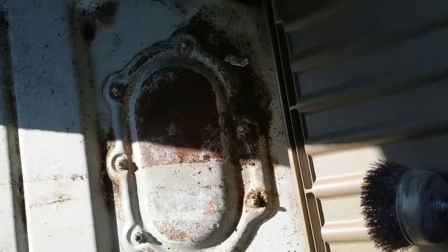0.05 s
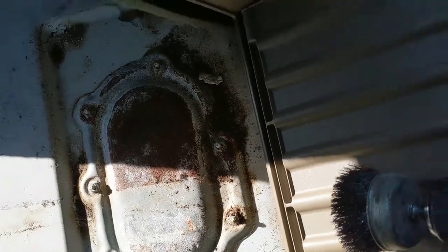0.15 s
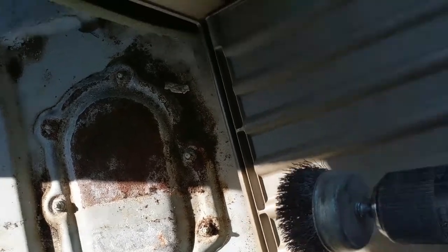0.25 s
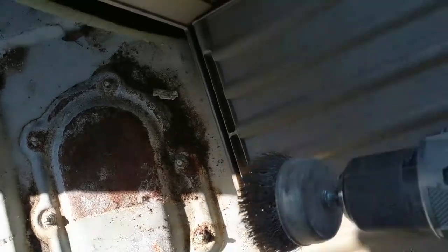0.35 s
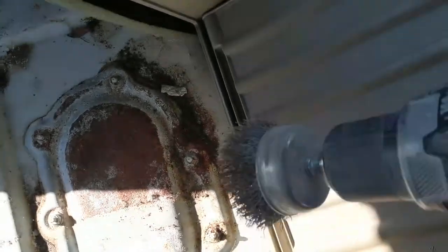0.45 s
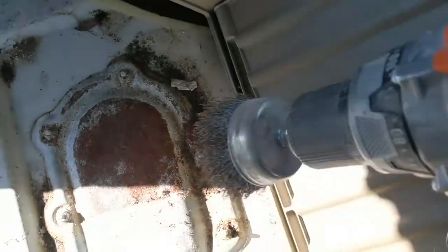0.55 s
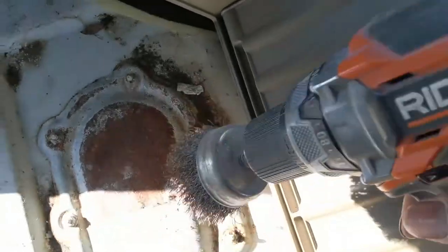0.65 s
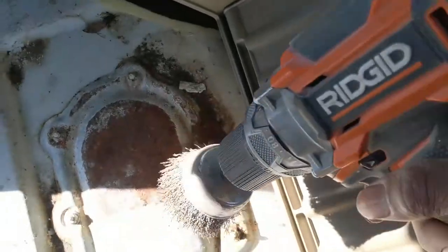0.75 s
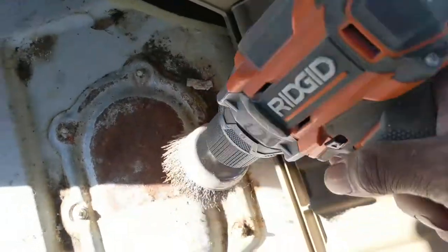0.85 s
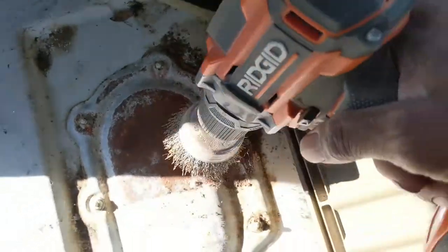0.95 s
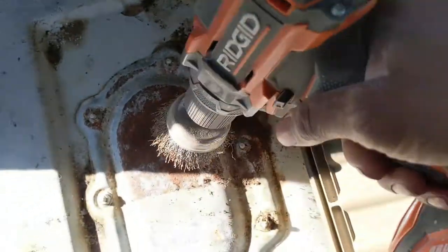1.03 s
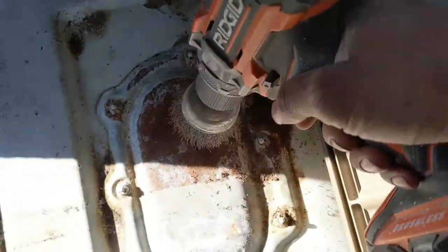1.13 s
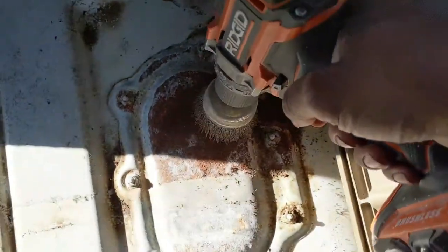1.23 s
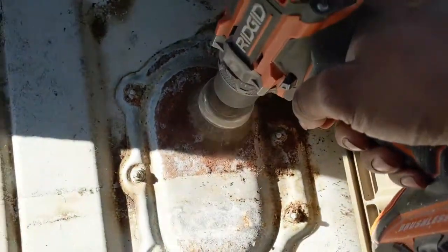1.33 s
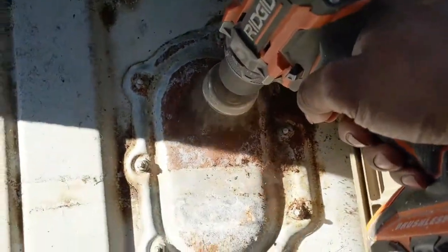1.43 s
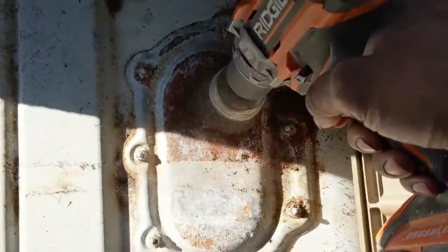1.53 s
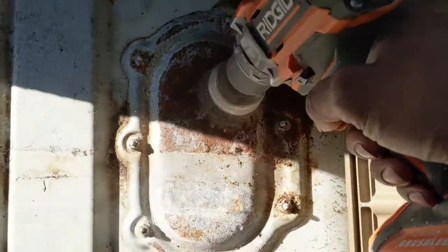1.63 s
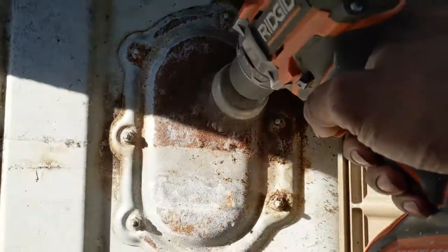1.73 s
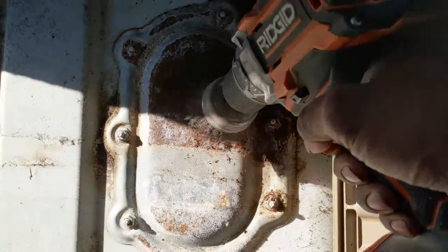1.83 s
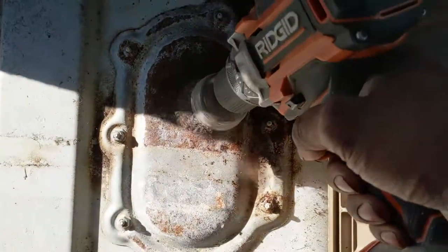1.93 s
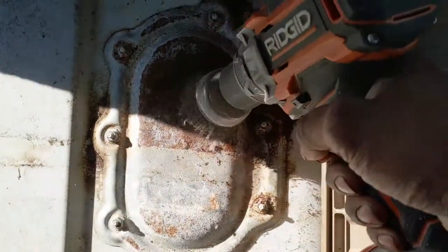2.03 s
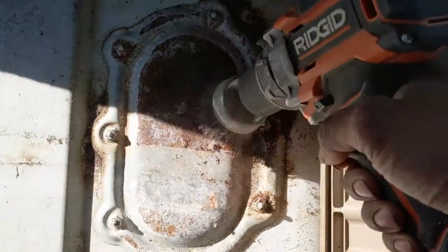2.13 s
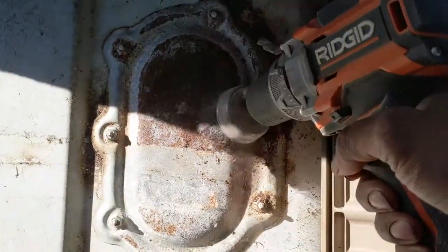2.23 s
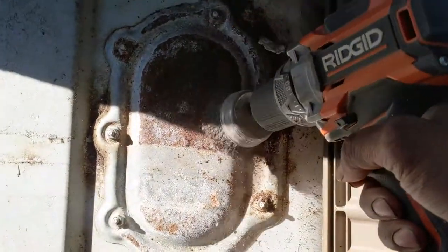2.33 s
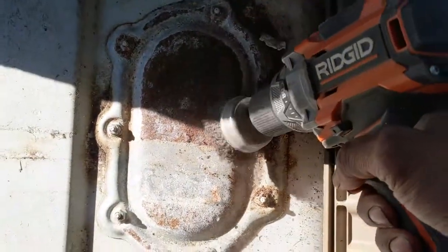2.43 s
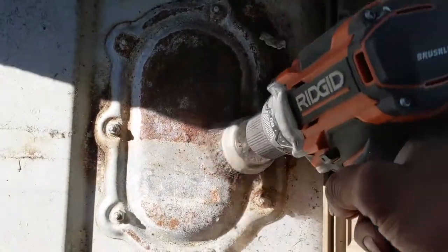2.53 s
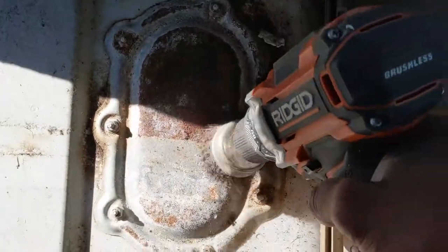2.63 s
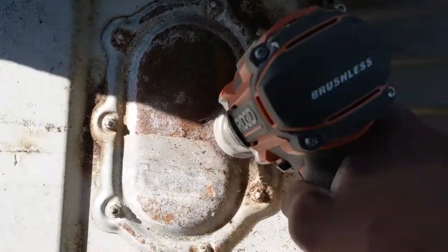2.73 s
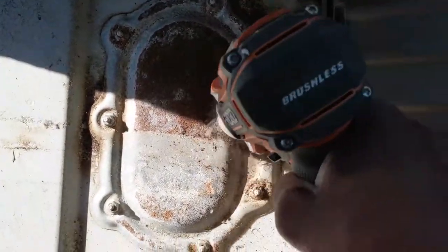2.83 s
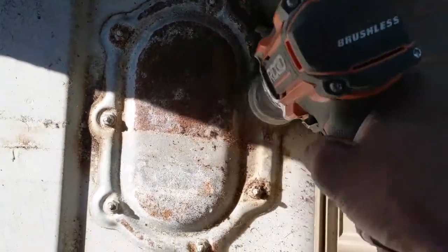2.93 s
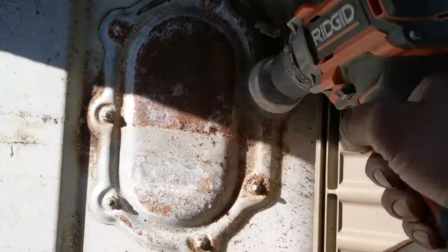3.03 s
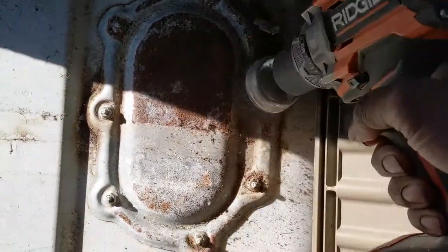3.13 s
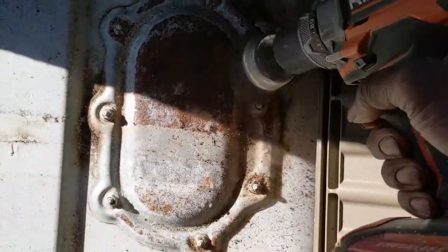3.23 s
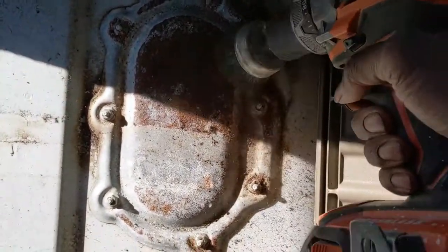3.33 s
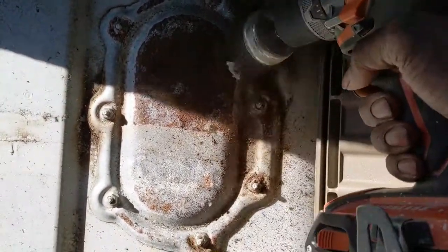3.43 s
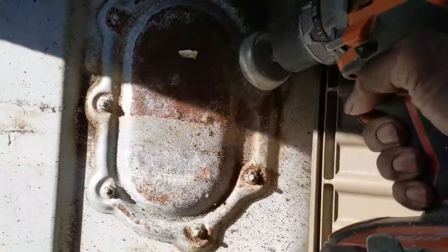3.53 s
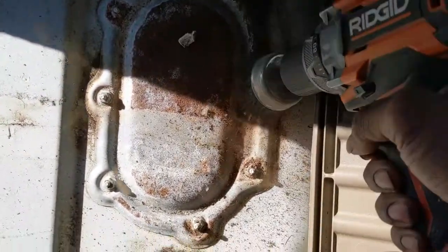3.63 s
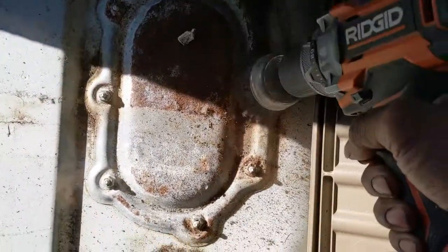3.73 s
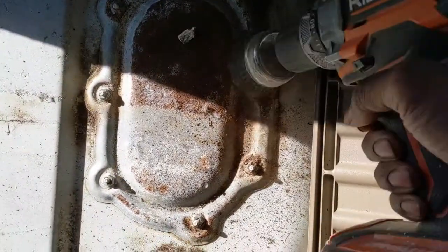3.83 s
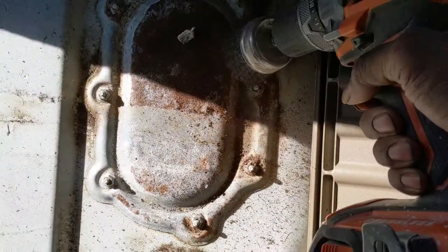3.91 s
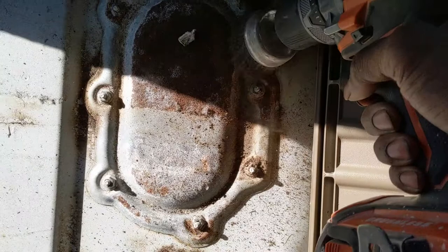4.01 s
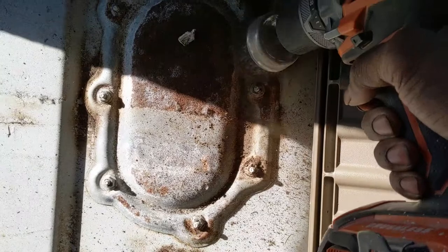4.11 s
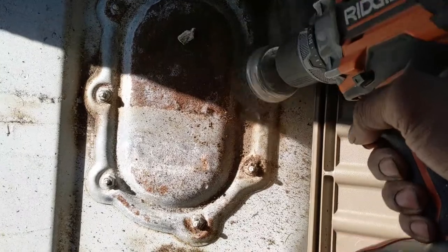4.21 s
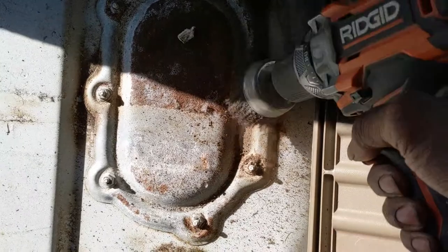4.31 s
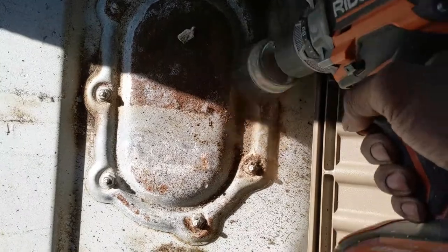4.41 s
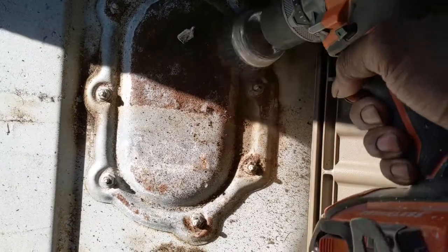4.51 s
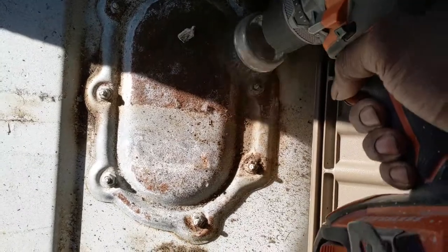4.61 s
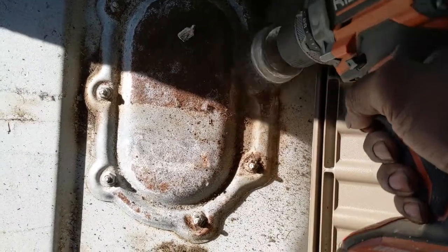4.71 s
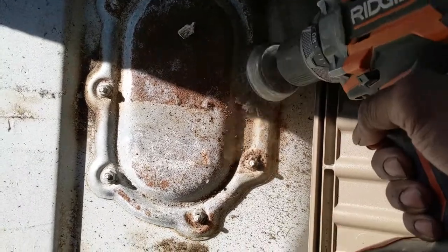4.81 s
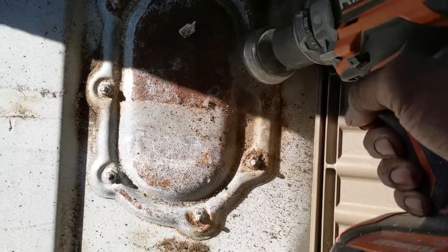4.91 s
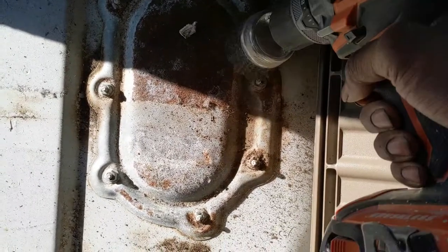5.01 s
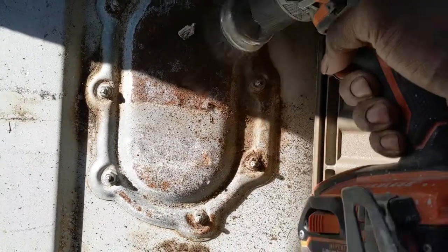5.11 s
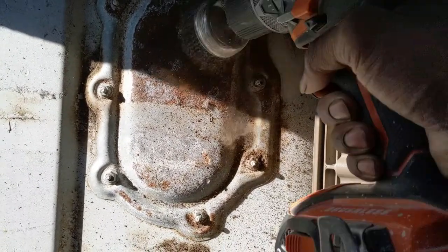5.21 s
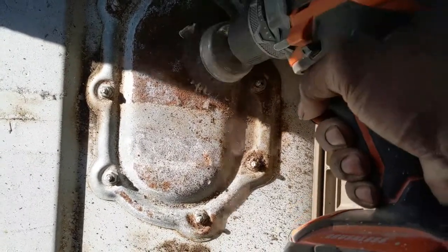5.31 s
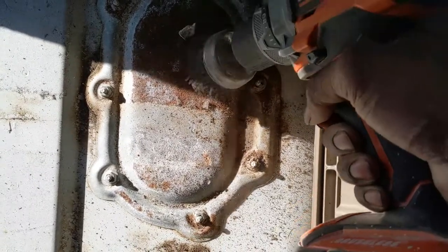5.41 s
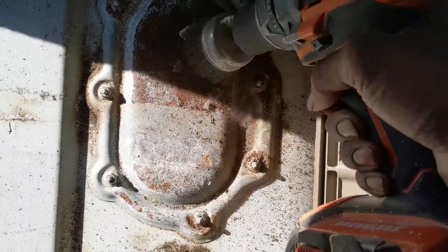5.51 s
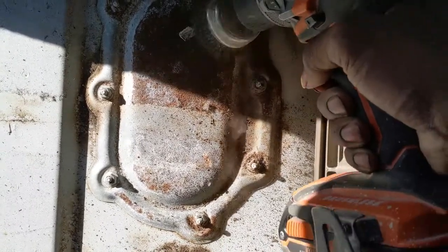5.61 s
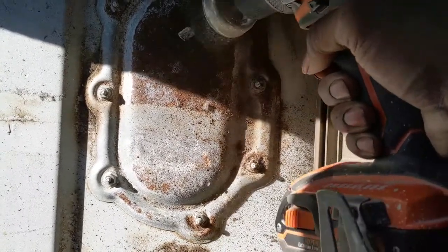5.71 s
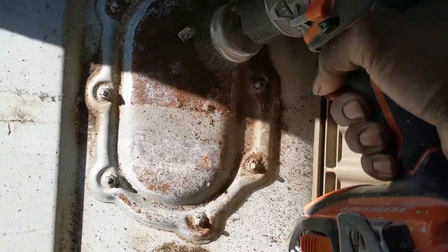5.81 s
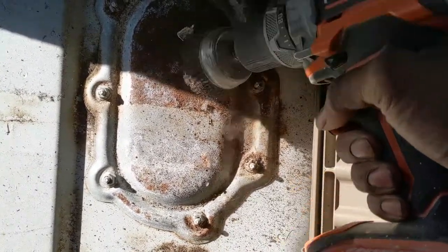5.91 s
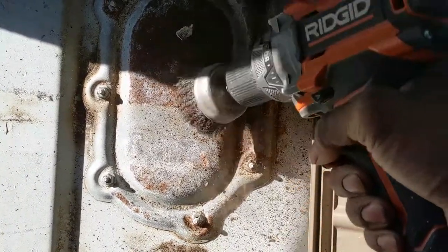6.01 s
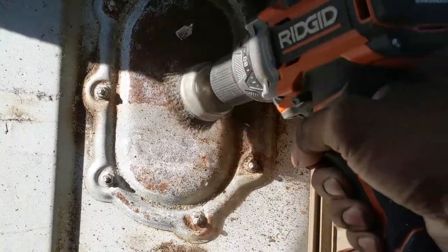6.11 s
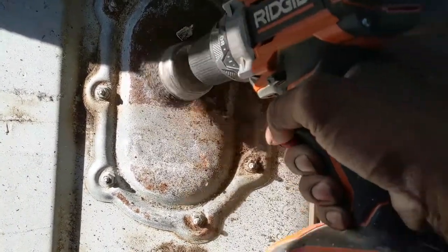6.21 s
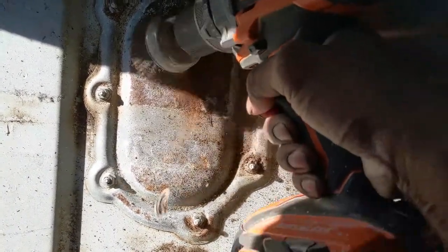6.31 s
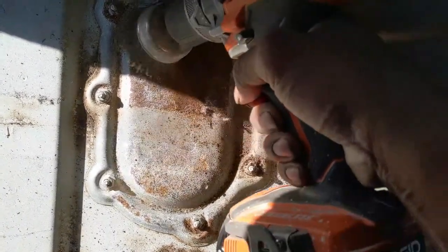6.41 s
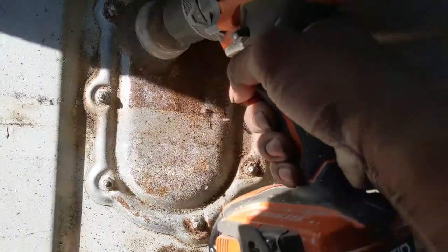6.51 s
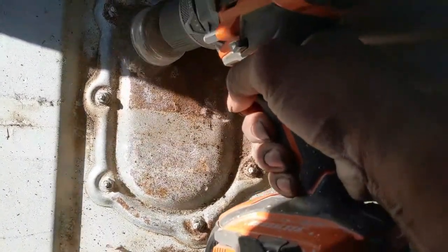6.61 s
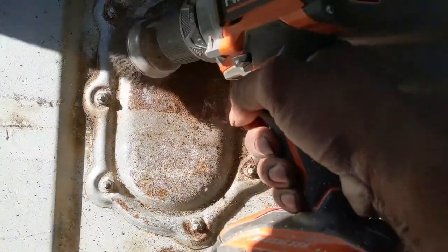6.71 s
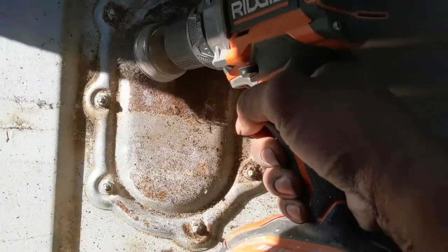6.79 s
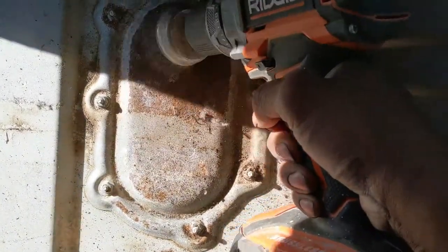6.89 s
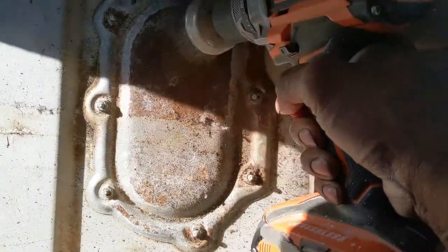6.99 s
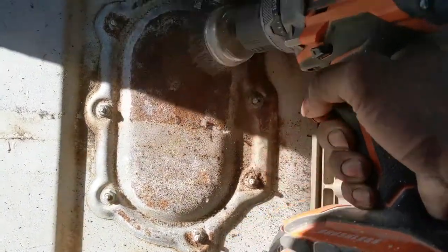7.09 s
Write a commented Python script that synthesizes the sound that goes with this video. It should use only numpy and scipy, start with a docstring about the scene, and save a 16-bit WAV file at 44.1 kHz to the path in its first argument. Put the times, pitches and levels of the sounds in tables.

```python
"""Outdoors, over a steel floor pan with a rusty lid, a phone held close: a cordless drill works the rust.
Behind it lie a faint hiss, a low hum and a hand's scrape; at first the tool clicks and is set down.
Then a wire cup brush spins on the lid: off-centre, it bites once a turn in spells.
Its bristles ring the steel as filtered noise, gears and motor whine as wavering sines,
and the tool knocks on the lid, sets its modes droning and shakes the pan."""
import sys
import numpy as np
from scipy import signal
from scipy.fft import rfft, irfft
from scipy.io import wavfile
from scipy.ndimage import uniform_filter1d

SR = 44100
rng = np.random.default_rng(int(sys.argv[2]) if len(sys.argv) > 2 else 0)


def put_to_file(sound):
    """Save the sound as 16-bit audio at rate SR, in the file named by the first command-line argument."""
    columns = np.atleast_2d(sound).T  # one column per channel
    safe = np.clip(columns, -1, 1)
    whole_steps = np.round(safe * 32767)
    wavfile.write(sys.argv[1], SR, whole_steps.astype(np.int16))


N = 315315
TIME = np.arange(N) / SR


def undb(db):
    """Amplitude for a level in dB."""
    return 10 ** (np.asarray(db) / 20)


def unit(x):
    """Scale to an rms of 1."""
    return x / np.sqrt(np.mean(x ** 2))


def level_above(x, hz):
    """Spread of the sound above a cutoff in Hz."""
    highpass = signal.butter(4, hz, "high", fs=SR, output="sos")
    return np.std(signal.sosfilt(highpass, x))


def left_right(db):
    """Gains that raise the left port and lower the right by the same dB."""
    return undb(np.array([[db], [-db]]))


def curves(table):
    """Columns of a table after its times, joined by straight lines."""
    t, *columns = np.transpose(table)
    return [np.interp(TIME, t, column) for column in columns]


def along(points):
    """Values of (Hz, value) points at every frequency bin, joined along log frequency."""
    hz, value = np.transpose(points)
    bins_hz = np.arange(N // 2 + 1) * SR / N
    return np.interp(np.log(bins_hz + 1), np.log(hz), value)


def colour(x, points):
    """Shape a spectrum by (Hz, dB) points."""
    return irfft(rfft(x) * undb(along(points)), N)


def ring(x, modes):
    """Sum of two-pole resonances (Hz, width Hz, dB) of alternating sign."""
    total = 0
    for k, (hz, width, db) in enumerate(modes):
        mode = signal.lfilter(*signal.iirpeak(hz, hz / width, SR), x) / np.sqrt(width)
        total = total + (-1) ** k * undb(db) * mode
    return total


def walk(rate):
    """Random levels held 1 / rate s and slewed twice; spread near 1."""
    k = int(SR / rate)
    held = np.repeat(rng.standard_normal(N // k + 1), k)
    return 1.304 * uniform_filter1d(uniform_filter1d(held, k), k)[:N]


# Likeness of the phone's left and right microphones: f/Hz, likeness [0-1]
LIKENESS = [(60, 0.93), (130, 0.86), (300, 0.83), (640, 0.8), (1400, 0.68), (3100, 0.28), (7000, 0.03)]


def pair():
    """Noise for two microphones, alike in the bass and nearly unrelated in the treble."""
    alike = np.clip(along(LIKENESS), 0, 1)
    mid, side = rfft(rng.standard_normal((2, N)))
    mid, side = mid * np.sqrt(1 + alike), side * np.sqrt(1 - alike)
    return unit(irfft(np.array([mid + side, mid - side]), N))


# Colour of the open-air hiss: f/Hz, relative level/dB per Hz
AIR_COLOUR = [(190, 2), (330, -13), (420, -8.5), (900, -9), (1430, -7.5), (1900, -18), (2900, -10),
              (5660, -14), (16000, -21)]
# Air at the phone: t/s, hiss level/dB (above 300 Hz), hand scrape level/dB
AIR_LEVELS = [(0, -66, -57), (.12, -63.5, -80), (.22, -74.5, -89), (.45, -71, -76), (.52, -71, -70),
              (.63, -75.5, -83), (.72, -67, -71), (.95, -64, -85), (1.06, -62, -71), (1.12, -62.5, -60),
              (1.25, -62, -61), (1.35, -58, -70)]
# Distant rumble: f/Hz, width/Hz, level/dB
RUMBLE = [(45.3, 10, -61), (88.2, 5.5, -65)]
DRONE_HZ, DRONE_DB = 134.3, -65  # mean pitch and level of the drone


def outdoors():
    """Coloured noise for hiss, resonant noise for scrape and rumble, a wavering sine for the drone."""
    air = colour(pair(), AIR_COLOUR)
    air = air / level_above(air, 300)
    rumble = sum(undb(db) * unit(ring(rng.standard_normal(N), [(hz, width, 0)]))
                 for hz, width, db in RUMBLE)
    drone_phase = 2 * np.pi * np.cumsum(DRONE_HZ + 2.53 * walk(5)) / SR
    drone = np.sqrt(2) * undb(DRONE_DB + 1.5 * walk(8)) * np.sin(drone_phase)
    hiss_db, scrape_db = curves(AIR_LEVELS)
    scrape_mode = [(204.6, 150, 0)]
    scrape = unit(ring(ring(pair(), scrape_mode), scrape_mode)) * undb(scrape_db)
    return air * undb(hiss_db + 1.2 * walk(8.9)) + scrape + rumble + drone


# Plastic clicks of the tool: t/s, nominal peak level/dB, brightest f/Hz,
# 60 dB decay/s (held to 0.06 s at most), left minus right/dB
TOOL_CLICKS = [(0.069, -43, 1170, 0.14, 7), (0.098, -24, 5740, 0.045, 1), (0.151, -31, 3020, 0.035, -1.5),
               (0.401, -20, 3780, 0.072, -0.5), (0.675, -57, 780, 0.26, -1.0),
               (0.724, -47, 5250, 0.035, 0.5), (0.757, -42, 4490, 0.019, -7), (1.007, -24, 5700, 0.042, 4),
               (1.028, -22.5, 3560, 0.038, 1.5)]


def clicks():
    """Sharp cracks with a rattling tail: noise bursts, brightest around one pitch."""
    out, t = np.zeros((2, N)), TIME[:SR // 8]
    for start, db, hz, t60, pan_db in TOOL_CLICKS:
        noise = rng.standard_normal((3, len(t)))
        shared = noise[:2] + 0.53 * noise[2]  # partly alike at the two ports
        crack = signal.lfilter(*signal.butter(2, 700, "high", fs=SR), shared)
        crack = unit(crack + 0.87 * signal.lfilter(*signal.iirpeak(hz, 1.5, SR), crack))
        attack = 1 - np.exp(-t / 0.00027)
        tail = np.exp(-np.log(1000) * t / min(t60, .06)) * attack
        i = int(start * SR)
        out[:, i:i + len(t)] += undb(db - 5.5) * left_right(pan_db / 2) * crack * tail
    return out


# The tool bumps the lid: t/s, blow level/dB, ring f/Hz, thump level/dB (lifted 8 dB in the thump itself)
BLOWS = [(0.501, -42.5, 218, -72), (1.275, -18.5, 427, -32), (1.299, -28, 573, -31), (1.345, -44, 500, -39),
         (1.481, -22.5, 424, -54), (1.753, -31, 554, -48), (2.228, -23.5, 662, -48), (2.278, -26, 651, -43),
         (2.365, -26, 662, -57), (2.453, -35, 670, -45.5), (2.72, -24, 473, -53), (3.067, -26, 566, -45),
         (3.145, -26, 560, -45), (3.288, -26, 404, -47), (3.609, -27.5, 662, -37.5),
         (3.751, -29.5, 510, -43), (3.819, -27.5, 630, -44), (3.903, -31, 655, -38), (4.258, -32, 697, -37),
         (4.322, -27, 680, -48), (4.479, -39, 153, -48), (4.775, -27, 338, -41), (4.889, -24.5, 536, -37),
         (4.937, -28, 462, -45)]
# Low modes of the lid: f/Hz, width/Hz, relative level/dB
LID_MODES = [(546, 96, -6), (665.7, 33.4, 0), (882, 36, -0.5), (917, 14, 2), (953, 89, 8), (976.4, 25, 5.5)]
# Modes of the loose parts: f/Hz, width/Hz, relative level/dB
RATTLE_MODES = [(127, 26, -0.5), (224, 36, 2), (318, 48, -2), (454, 58, -1)]


def knocks():
    """A blunt blow and two bounces: a short ring, the sheet's modes and a low thump."""
    out, blows, t = np.zeros(N + SR), np.zeros(N), TIME[:SR // 5]
    for (start, db, hz, thump_db), chance in zip(BLOWS, rng.random((len(BLOWS), 2))):
        i = int(start * SR)
        out[i:i + len(t)] += undb(thump_db + 8) * np.sin(2 * np.pi * 65 * t) * np.exp(-t / 0.033)
        short_ring = np.sin(2 * np.pi * hz * t) * np.exp(-t / 0.0043)
        # delay in s and level in dB of the blow and its bounces
        hits = ((.003, 0), (0.00906 + 0.00388 * chance[0], -5), (0.018 + 0.0059 * chance[1], -9))
        for late, change_db in hits:
            j = i + int(late * SR)
            out[j:j + len(t)] += undb(db + change_db) * short_ring
            blows[j:j + 24] = undb(db + change_db) * np.hanning(24)
    sheet_ring = undb(15) * ring(blows, RATTLE_MODES + LID_MODES)
    return (out[:N] + sheet_ring - undb(-5) * blows) * left_right(.8)


# Steady load on the sheet: t/s, lid drone level/dB, floor pan shake level/dB, rattle level/dB
STEADY_PRESS = [(1.3, -47, -48, -55), (1.9, -48, -46, -54), (2.18, -45, -48, -53), (2.3, -42, -49, -45),
                (2.47, -38, -50, -42), (2.6, -45, -45, -52), (3.0, -43, -47, -46), (3.12, -49, -49, -51),
                (3.4, -42, -50, -55), (3.56, -45, -49, -54), (3.68, -41, -43, -49), (3.95, -42, -46, -52),
                (4.2, -43, -50, -54), (5.0, -40, -45, -49), (5.3, -43.5, -49, -56),
                (5.95, -43.5, -46.5, -54), (6.3, -41, -51, -60), (6.7, -39, -52, -58),
                (6.95, -41.5, -55, -58), (7.15, -45, -48, -55)]
# Shaking after a knock, for lid, pan and rattle: level against the blow (pan: the thump)/dB
AFTER_LEVEL = [-20, -1, -18]
# Dying time of that shaking, for lid, pan and rattle: time/s
AFTER_TIME = [.05, .09, .07]


def load():
    """Levels of lid, pan and rattle: the powers of steady push and shaking after each knock add."""
    levels = []
    columns = (1, 3, 1)  # lid and rattle follow the blow, the pan follows the thump
    for steady_db, column, more_db, dies_s in zip(curves(STEADY_PRESS), columns, AFTER_LEVEL, AFTER_TIME):
        after = 0
        for row in BLOWS:
            since = TIME - row[0]
            dying = np.exp(-2 * np.maximum(since, 0) / dies_s) * (since > 0)
            after = after + undb(row[column] + more_db) ** 2 * dying
        power = undb(steady_db) ** 2 + uniform_filter1d(after, size=SR // 50)
        levels.append(10 * np.log10(power))
    return levels


# Colour of the floor pan's shake: f/Hz, relative level/dB per Hz
PAN_COLOUR = [(15, -11), (40, 6), (75, -2.5), (110, 0), (160, -29.5)]
# One lid mode sings: t/s, f/Hz, level/dB
LID_SQUEAL = [(5.6, 1690, -70), (5.8, 1691, -62), (6.2, 1653, -66), (6.32, 1640, -47), (6.6, 1630, -42.5),
              (6.9, 1638, -46.5), (7.05, 1630, -48), (7.15, 1680, -56)]


def sheet(turns, bite_db, lid_db, pan_db, rattle_db):
    """The lid drones and squeals, loose parts rattle and the pan shakes with the push of the brush."""
    push = np.cos(2 * np.pi * turns) * bite_db
    jolts = unit(undb(1.93 * rng.exponential(size=N // 100 + 1).repeat(100)[:N]))
    lid = unit(ring(pair(), LID_MODES)) * undb(lid_db + 1.0 * push + 1.1 * walk(30))
    rattle = unit(ring(pair() * jolts, RATTLE_MODES)) * undb(rattle_db + .7 * push)
    pan = unit(colour(rng.standard_normal(N), PAN_COLOUR)) * undb(pan_db + 0.15 * push)
    hz, db = curves(LID_SQUEAL)
    squeal_phase = 2 * np.pi * np.cumsum(hz + 8 * walk(50)) / SR
    squeal = np.sqrt(2) * undb(db + 1.96 * walk(40)) * np.sin(squeal_phase)
    return lid + rattle + squeal * (TIME > LID_SQUEAL[0][0]), pan


# The drill's motor: t/s, electrical f/Hz, level/dB of its fifth multiple, level/dB of its fourth
MOTOR_RUN = [(1.31, 473, -42, -59), (1.35, 635, -27, -49), (1.42, 1010, -53, -57), (1.47, 1000, -51, -59),
             (1.65, 761, -50, -48), (1.73, 685, -46, -44), (1.77, 645, -34, -46), (1.9, 615, -42, -51),
             (2.15, 626, -38, -48), (2.35, 670, -33.5, -49), (2.65, 693, -37, -43), (2.85, 724, -45, -48),
             (2.97, 719, -42, -49), (3.01, 686, -30, -49), (3.15, 740, -46, -54), (3.42, 710, -40, -50),
             (3.57, 722, -37, -48), (3.66, 700, -42, -57), (4.02, 732, -38, -52), (4.45, 716, -38, -53),
             (4.65, 726, -37, -56), (4.8, 702, -38, -52), (4.9, 720, -40, -53), (5.0, 700, -37, -55),
             (5.17, 716, -38, -48), (5.4, 682, -32, -48), (5.6, 668, -38, -45), (5.76, 660, -35, -46),
             (5.88, 680, -39, -48), (6.04, 680, -41, -54), (6.14, 673, -33, -54), (6.25, 662, -32, -42.5),
             (6.38, 647, -37, -41), (6.6, 637, -36, -42), (6.85, 644, -34, -39), (7.05, 645, -41, -47),
             (7.15, 663, -45, -48)]
# The brush wobbles in spells: deepest bite t/s, spread/s, bite level/dB
WOBBLE_SPELLS = [(1.394, .03, 3), (1.484, .03, 5), (1.556, .04, 5.5), (1.68, .05, 5.5), (1.82, .07, 3.5),
                 (1.975, .07, 4.2), (2.142, .07, 3.3), (2.611, .09, 3.3), (2.8, .05, 1.7), (3.069, .06, 3),
                 (3.272, .11, 4.2), (3.621, .04, 2), (3.717, .07, 2.3), (4.059, .12, 2.3), (4.481, .1, 2.2),
                 (4.694, .07, 2.5), (4.927, .1, 2.2), (5.355, .11, 3.5), (5.584, .07, 1.8), (5.902, .08, 3),
                 (6.044, .08, 2.3), (6.593, .15, 1)]
GEAR_RATIO = 48  # motor cycles per brush turn


def wobble():
    """Brush turns, geared down from the motor, and bite depth: spells of once-a-turn swing add up."""
    turns = np.cumsum(curves(MOTOR_RUN)[0]) / SR / GEAR_RATIO
    bite = 0
    for deepest, spread, db in WOBBLE_SPELLS:
        swell = -.5 * ((TIME - deepest) / spread) ** 2
        turned = turns - np.interp(deepest, TIME, turns)
        bite = bite + db * np.exp(swell + 2j * np.pi * turned)
    return np.angle(bite) / (2 * np.pi), np.abs(bite)


# The sixth multiple meets a ring of the housing: t/s, level/dB
HOUSING_LEVEL = [(1.3, -55), (1.4, -46), (3.1, -51), (3.3, -45), (3.6, -52), (3.8, -38), (4.1, -42),
                 (5.2, -42), (5.4, -62)]
# That ring: f/Hz, width/Hz, relative level/dB
HOUSING_MODE = [(4364, 42, 0)]


def housing_ring():
    """Noise through one narrow resonance of the housing."""
    return unit(ring(pair(), HOUSING_MODE)) * undb(curves(HOUSING_LEVEL)[0])


# Multiples of the motor frequency that the run's two level columns belong to: multiple
STRONG_MULTIPLES = [5, 4]
# Weaker lines of steady mean level: multiple, level/dB
WEAK_MULTIPLES = [(1, -54), (2, -53), (2.5, -53), (3, -56), (6, -60)]
# Gear chatter in the whine: t/s, share of power [0-1]
CHATTER_SHARE = [(1.3, .85), (1.6, .6), (2.2, .45), (2.4, .25), (3.1, .3), (3.4, .65), (5.2, .65),
                 (5.5, .5), (6.1, .4), (6.4, .2), (7.15, .2)]
# Switching tone, split in two: t/s, lower level/dB, upper level/dB
SWITCH_LEVELS = [(1.45, -64, -75), (1.7, -37.5, -54), (1.9, -44, -53), (2.1, -46.5, -50), (3, -46, -48.5),
                 (5.2, -47.5, -50), (5.6, -55.5, -56), (6.4, -47, -49), (7.15, -48, -51)]
SWITCH_HZ = 10000


def motor(turns, bite_db):
    """Gear and magnet whine; the switching tone splits by the motor's own frequency."""
    hz, *dbs = curves(MOTOR_RUN)
    rough, = curves(CHATTER_SHARE)
    # each bite brakes the motor a little and loads the gears
    brake = .008 * bite_db * np.sin(2 * np.pi * turns + .25)
    hz = hz * (1 - brake + .008 * rough * walk(70))
    phase = 2 * np.pi * np.cumsum(hz) / SR
    load_db = 0.3 * bite_db * np.cos(2 * np.pi * turns - 1.2)
    whine = 0
    for k, db in list(zip(STRONG_MULTIPLES, dbs)) + WEAK_MULTIPLES:
        # uneven teeth smear part of each line into a narrow band
        chatter = (walk(80 * k) + 1j * walk(80 * k)) / np.sqrt(2)
        chatter = np.array([chatter, chatter[::-1]])
        tone = (np.sqrt(1 - rough) + np.sqrt(rough) * chatter) * np.exp(1j * k * phase)
        flicker_db = 3.67 * np.sqrt(rough) * walk(30)
        whine = whine + undb(db + load_db + flicker_db) * tone.imag
    for sign, db in zip((-1, 1), curves(SWITCH_LEVELS)):
        split = 2 * np.pi * SWITCH_HZ * TIME + sign * phase + 0.54 * walk(150)
        # the right port hears the tone a quarter cycle late
        split = split - np.array([[0], [np.pi / 2]])
        whine = whine + undb(db + 3.0 * walk(40)) * np.sin(split)
    return np.sqrt(2) * whine * np.clip((TIME - 1.3) / .03, 0, 1)


# Bristle hiss close to the phone, before the bites: t/s, level/dB (steel colour above 4500 Hz)
BRISTLE_HISS = [(1.268, -70), (1.285, -48), (1.31, -41), (1.39, -29.5), (1.7, -30.5), (2.1, -29.5),
                (2.4, -30), (2.8, -31.5), (3.0, -30.5), (3.16, -32.5), (3.4, -30), (3.8, -29), (4.1, -30),
                (4.3, -29.5), (4.65, -30.5), (5.1, -30.5), (5.35, -27.5), (5.7, -29), (5.85, -31.5),
                (6.02, -29), (6.15, -30.5), (6.3, -29), (7.07, -29.7), (7.15, -38)]
# Colour of the brushed steel: f/Hz, relative level/dB per Hz
STEEL_COLOUR = [(500, -28), (1100, -20), (1600, -23), (2300, -10), (2700, -6), (3400, -11.5), (4400, -6.5),
                (5900, -8), (6600, -14.5), (7500, -11), (8700, -16.5), (9600, -12), (12700, -14),
                (13500, -7.5), (15400, -9)]
# Rings of the brushed steel: f/Hz, width/Hz, relative level/dB
STEEL_RINGS = [(1320, 130, -11.5), (2570, 80, -14.5), (3450, 650, -2)]
DIP_SHARE = .6  # dB of mean hiss lost per dB of bite


def brush(turns, bite_db):
    """Wire tips flick over rust: dense uneven scratches that ring the steel."""
    hiss_db = curves(BRISTLE_HISS)[0] - DIP_SHARE * bite_db
    scratches_db = 1.0 * rng.exponential(size=N // 40 + 1).repeat(40)[:N]
    grit = undb(scratches_db + 1.0 * walk(60) + 0.26 * walk(25))
    tips = pair() * unit(grit)
    steel = colour(tips, STEEL_COLOUR)
    steel = steel / level_above(steel, 4500)
    steel = steel + undb(-12.5) * unit(ring(tips, STEEL_RINGS))
    return steel * undb(hiss_db + bite_db * np.cos(2 * np.pi * turns))


def scene():
    """The running tool on the sheet, over its knocks, the clicks and the open air."""
    background = outdoors() + clicks() + knocks()
    turns, bite_db = wobble()
    lid, pan = sheet(turns, bite_db, *load())
    tool = housing_ring() + motor(turns, bite_db) + brush(turns, bite_db)
    running = np.clip((TIME - 1.272) / 0.0074, 0, 1)
    # tool and lid stand 2 dB louder on the left, the pan in the middle
    return ((tool + lid) * left_right(2 / 2) + pan) * running + background


# Timing between the phone's ports: f/Hz, lead of the left port [radians, negative is late]
PORT_LEAD = [(90, 0), (200, -.45), (950, -.6), (1700, -.6), (2600, 0)]
TOP_HZ = 15730  # upper edge of what the phone passes


def record(dry):
    """Each port favours some bands, the left hears the low mids later; the phone cuts the top."""
    # f/Hz, level/dB added on the left and taken off on the right
    tilt = undb(along([(200, -0.22), (330, -1.2), (600, 3.6), (1200, 1.0),
                       (4000, -0.65), (9000, -1.3), (14000, 1.5)]))
    tilt = tilt * np.exp(.5j * along(PORT_LEAD))
    ports = irfft(rfft(dry) * np.array([tilt, 1 / tilt]), N)
    return signal.sosfilt(signal.ellip(16, .3, 75, TOP_HZ, fs=SR, output="sos"), ports)


dry = scene()
out = record(dry)
put_to_file(out)
```